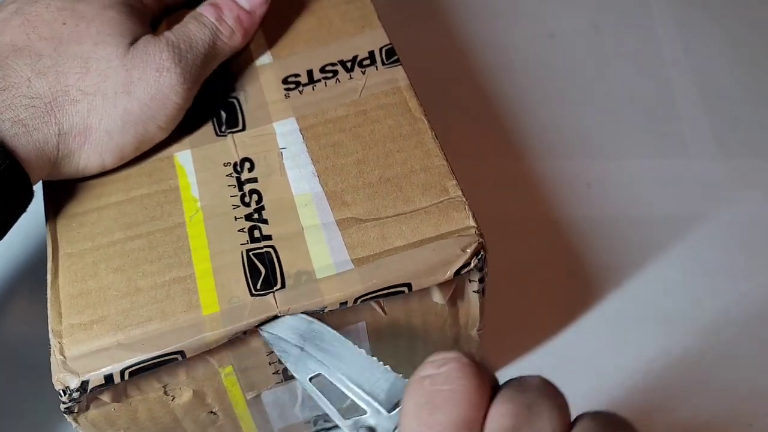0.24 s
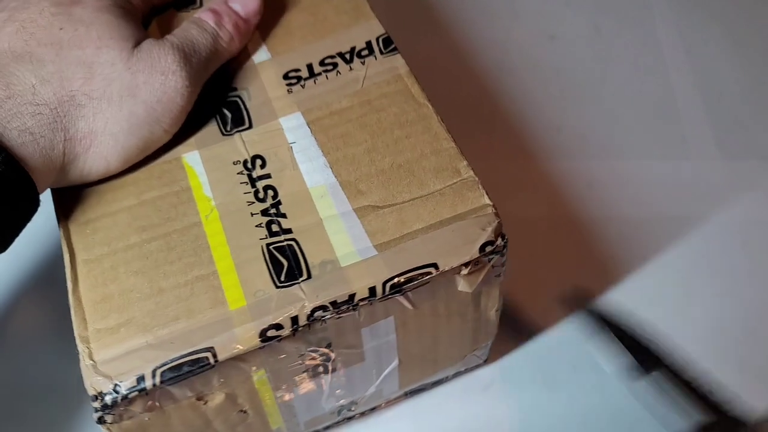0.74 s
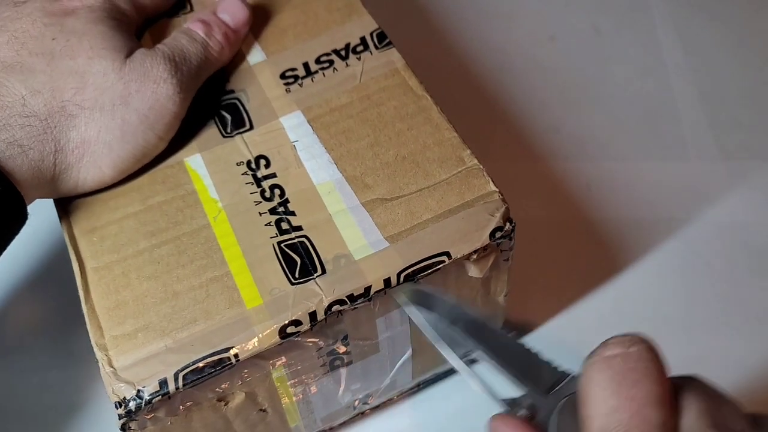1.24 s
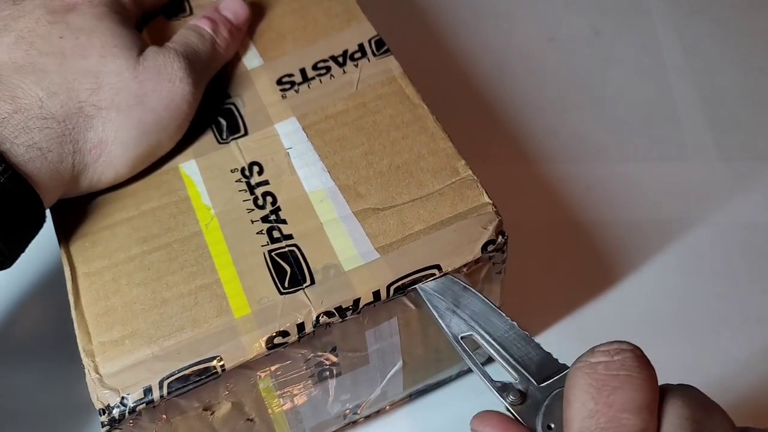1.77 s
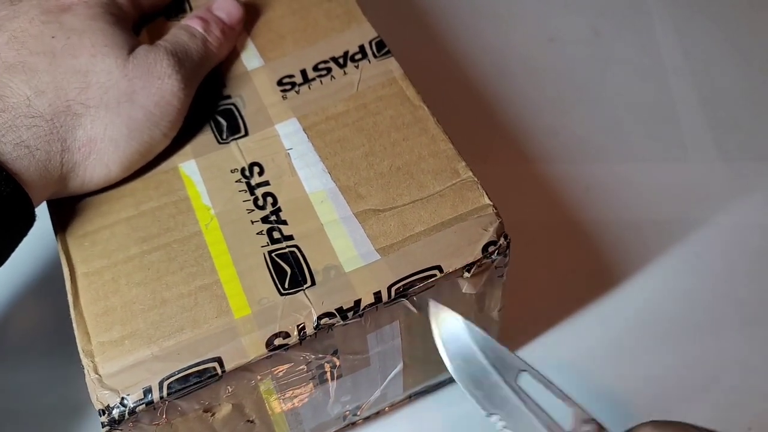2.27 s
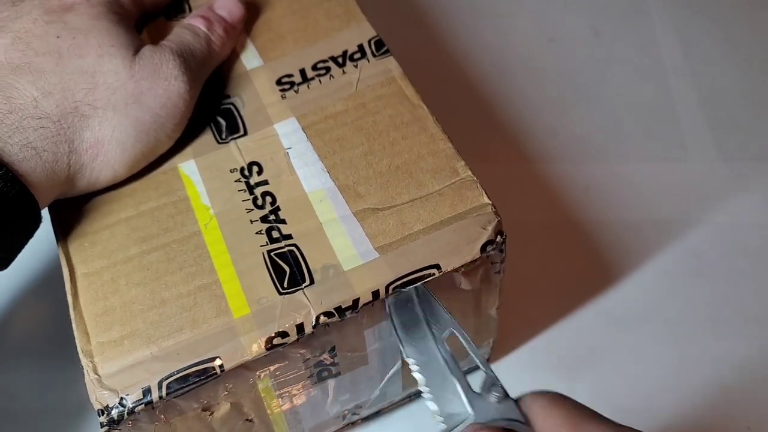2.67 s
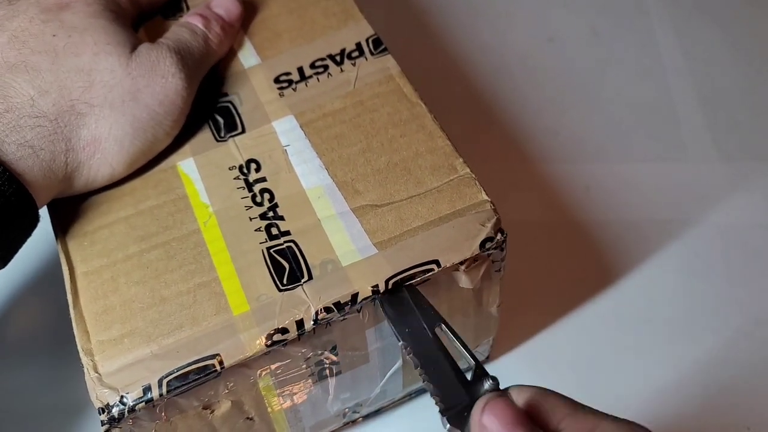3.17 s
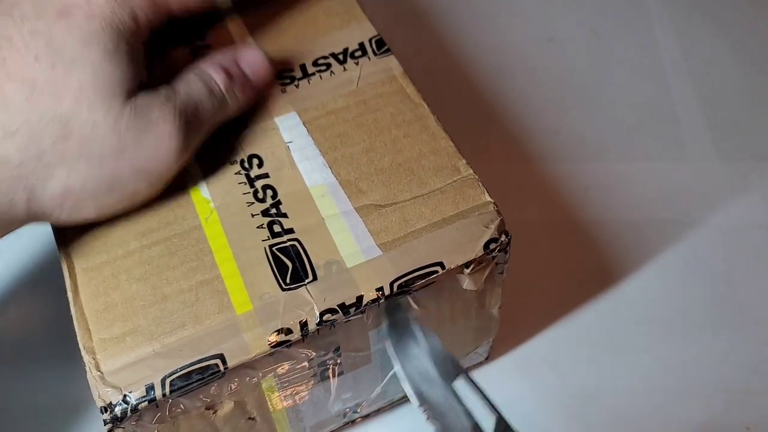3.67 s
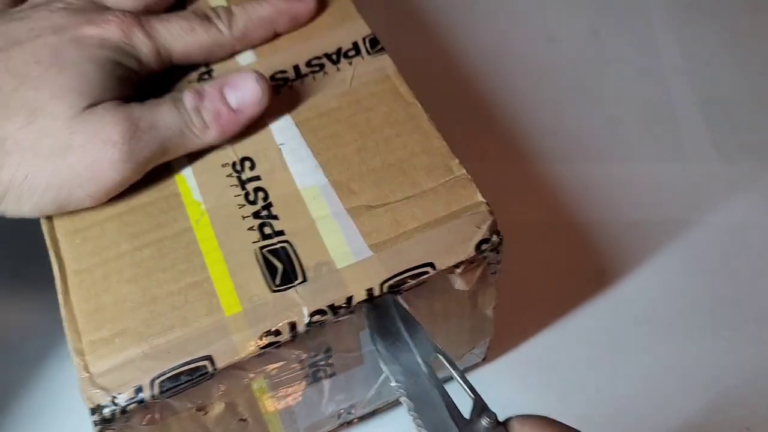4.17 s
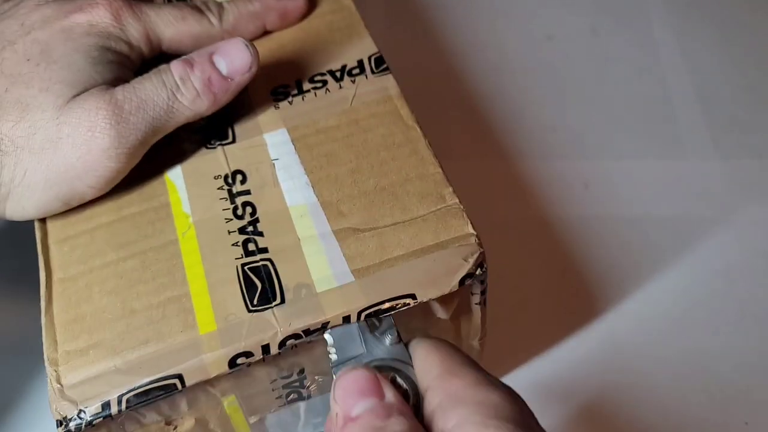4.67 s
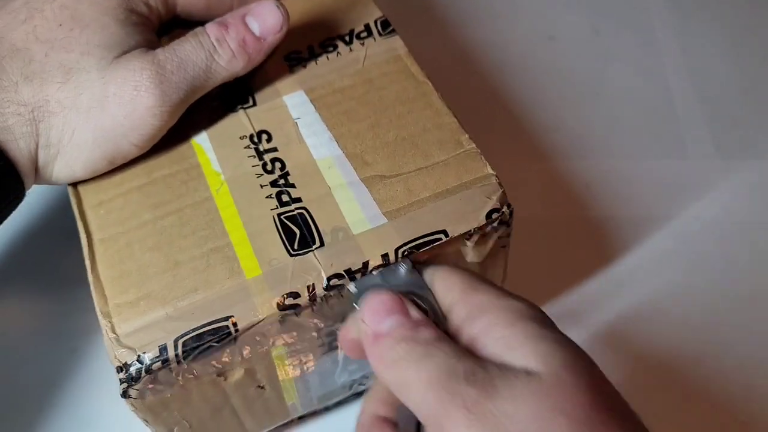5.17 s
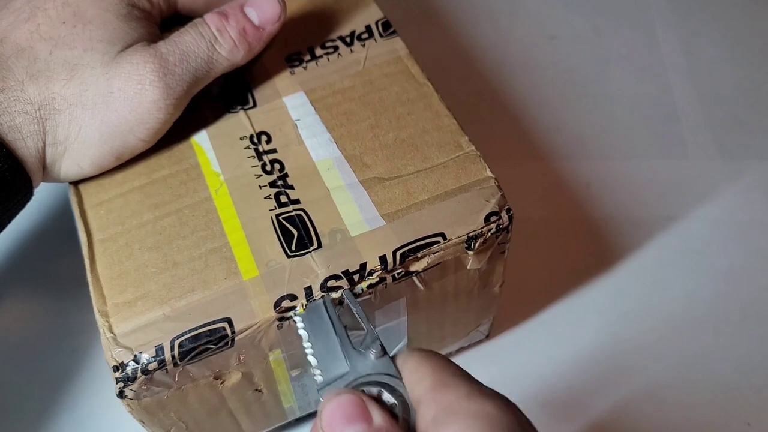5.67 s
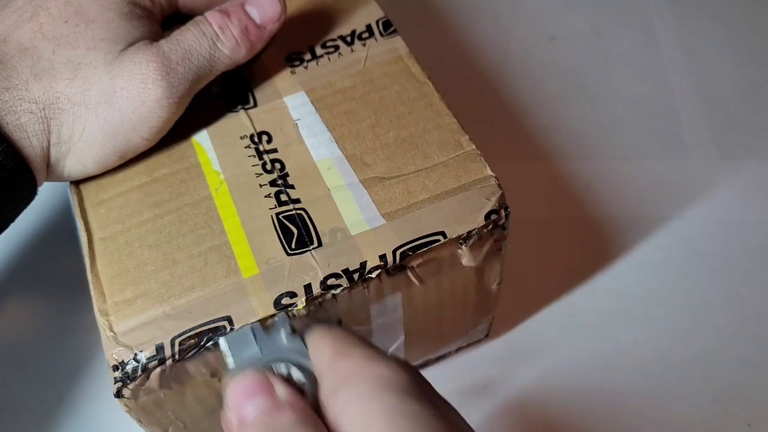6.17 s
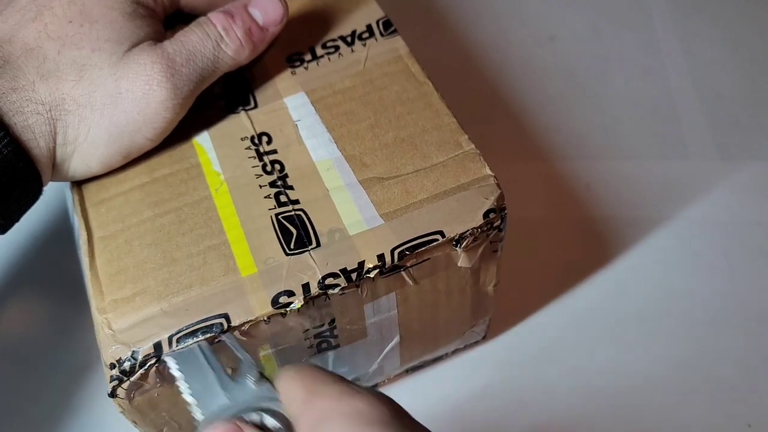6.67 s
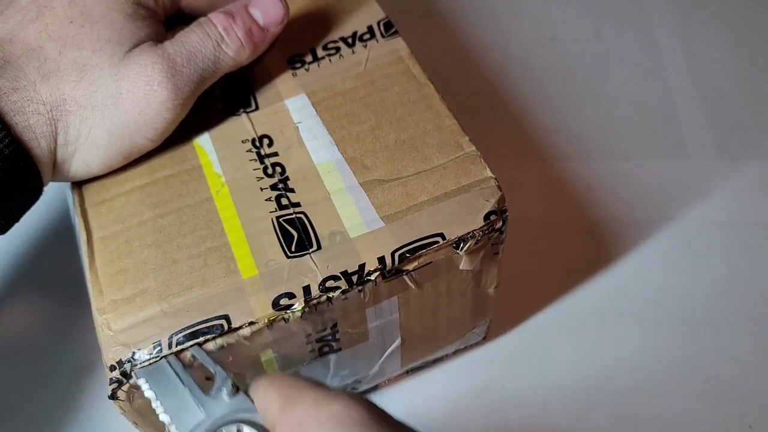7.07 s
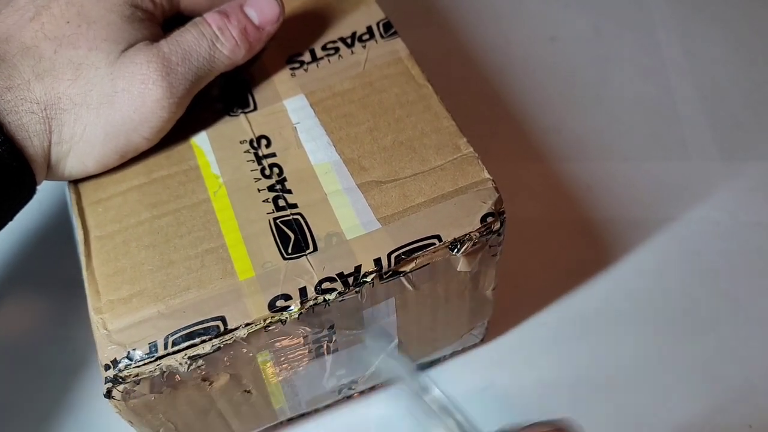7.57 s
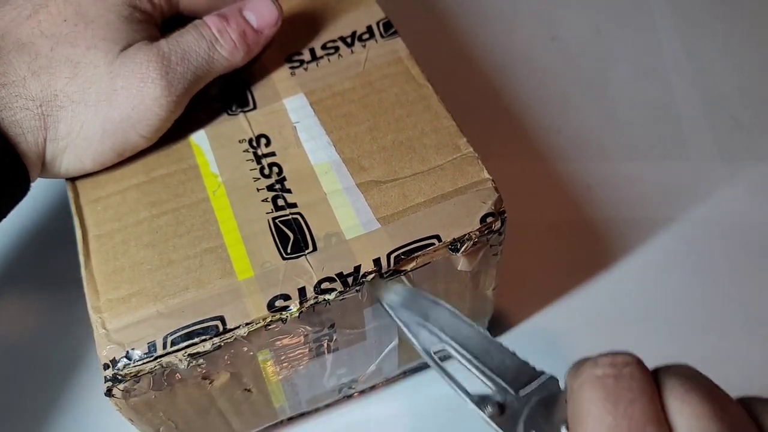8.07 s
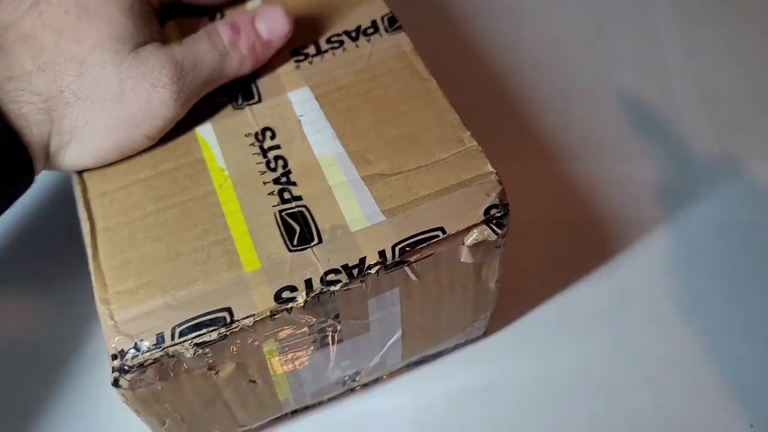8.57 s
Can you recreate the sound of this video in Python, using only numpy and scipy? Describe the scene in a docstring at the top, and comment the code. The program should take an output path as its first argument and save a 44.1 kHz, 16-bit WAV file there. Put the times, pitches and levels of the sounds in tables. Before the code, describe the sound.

In a quiet small room, a knife blade scrapes through tape and cardboard right by the microphone. The first cut ends in a loud crack. A few separate rasps and ticks lead into a run of quick, uneven sawing strokes, with the tape crackling and the box popping and softly thumping. The strokes thin out, and after a short lull comes one more cut with some light knocks.

```python
"""A serrated knife saws through the packing tape along the edge of a cardboard box, close to the microphone.
Stick-slip clicks, shaped by each stroke, excite the card, the box panels and the tape film as filters.
Now and then the tape snaps or the card pops, ticks or is tapped, as short fracture bursts,
or a panel is knocked, a decaying oscillation; the first cut ends in a loud crack.
Faint modes of the hollow box, the echo of a small room and still air surround it all."""
import sys
import numpy as np
from scipy import signal
from scipy.fft import rfft, irfft, next_fast_len
from scipy.io import wavfile

SR = 44100
rng = np.random.default_rng(int(sys.argv[2]) if len(sys.argv) > 2 else 0)


def to_wav(sig):
    """Store sig (one row per channel, or 1-D mono) as 16-bit WAV at the path in sys.argv[1].

    Samples outside -1..1 are clipped; the rate is SR.
    """
    pcm = np.clip(np.atleast_2d(sig), -1, 1) * 32767
    pcm = np.round(pcm).astype(np.int16)
    wavfile.write(sys.argv[1], SR, pcm.T)  # frames by channels


N = 389841
T = np.arange(N) / SR  # time, s

# radiation colour of the box panels: f/Hz, relative level/dB
PANEL_COLOUR = [(30, -44.5), (65, -12), (100, -2.5), (160, -1), (350, 0), (450, -3), (620, -17.5),
                (1500, -75.5)]
# radiation colour of a fracture in cardboard: f/Hz, relative level/dB
FRACTURE_COLOUR = [(170, -29.5), (380, 2), (620, -2.5), (1000, 0.5), (2300, -3.5), (3700, -4), (4600, -9),
                   (7000, -15.5), (14000, -57)]


def undb(db):
    """Level to amplitude: 20 dB is a factor of ten."""
    return 10 ** (np.asarray(db) / 20)


def unit(x):
    """Energy normalisation: scale to a mean energy of one per channel."""
    return x / np.sqrt(np.mean(np.sum(x ** 2, axis=-1)))


def on_log_axis(hz, points, column=1):
    """Logarithmic frequency scale: interpolate a table column linearly in log frequency."""
    rows = np.array(points, float)
    return np.interp(np.log(hz + 1), np.log(rows[:, 0]), rows[:, column])


def response(points, size=4096):
    """Minimum phase: fold the cepstrum of a colour to get its causal impulse response, of energy one."""
    magnitude = undb(on_log_axis(np.fft.rfftfreq(size, 1 / SR), points))
    cepstrum = irfft(np.log(magnitude))
    cepstrum[1:size // 2] *= 2
    cepstrum[size // 2 + 1:] = 0
    return unit(irfft(np.exp(rfft(cepstrum))))


def through(x, impulse):
    """Linear systems: convolve both channels with an impulse response."""
    return signal.fftconvolve(x, np.atleast_2d(impulse), axes=-1)[:, :x.shape[-1]]


def fade(t, t60):
    """Exponential damping: the amplitude falls by 60 dB in t60 seconds."""
    return np.exp(-np.log(1000) * t / t60)


def walk(rate):
    """Random modulation: normal values drawn rate times a second and joined by straight lines."""
    count = int(T[-1] * rate) + 2
    return np.interp(T * rate, np.arange(count), rng.standard_normal(N)[:count])


def diffuse(size, alike_hz):
    """Diffuse-field coherence: two noise spectra, alike in the bass and unrelated in the treble."""
    hz = np.fft.rfftfreq(size, 1 / SR)
    mid, side = rfft(rng.standard_normal((2, size)))
    alike = 1 / (1 + (hz / alike_hz) ** 2)
    common = mid * np.sqrt(1 + alike)
    opposed = np.array([[1], [-1]]) * side * np.sqrt(1 - alike)
    return hz, (common + opposed) / np.sqrt(2)


def lag_at(s, scatter_ms):
    """Arrival-time difference: samples by which the left channel hears a spot on the box late."""
    # where the blade works along the edge: t/s, lag of the left channel/ms
    place = [(0, 0.077), (5.2, 0.085), (6.1, -0.049), (7.4, -.07), (8.2, 0.096)]
    return np.rint((np.interp(s, *np.transpose(place)) + scatter_ms) * SR / 1000).astype(int)


def add(out, s, sound):
    """Superposition: mix a short sound in at time s."""
    start = int(s * SR)
    out[:, start:start + sound.shape[1]] += sound[:, :out.shape[1] - start]


def air():
    """Stationary noise: faint coloured rumble and hiss of still room air."""
    # f/Hz, relative level/dB
    air_colour = [(20, -18), (50, -3), (90, -4), (200, -15.5), (370, -16.5), (850, -29), (1550, -24),
                  (2300, -40), (15000, -52)]
    hz, noise = diffuse(2 * N, alike_hz=300)
    hush = irfft(noise * undb(on_log_axis(hz, air_colour)))[:, :N]
    return unit(hush) * np.sqrt(N) * undb(-64.5)


def room(x, table_db, table_t60, wall_gap_s, count=15):
    """Reverberation: quick reflections off table and hands, then the walls, each band dying at its own rate."""
    # echo of the walls: f/Hz, level against the direct sound/dB, T60/s
    walls = [(100, -9.5, 0.43), (250, -11.5, 0.43), (450, -9.5, 0.55), (740, -9, 0.54), (1620, -9, 0.63),
             (3170, -8.5, 0.65), (6500, -7.5, 0.41), (13000, -9, 0.35)]
    t = T[:SR]
    hz, noise = diffuse(SR, alike_hz=523)
    edges = np.geomspace(50, 18000, count + 1)
    scatter_noise = diffuse(SR, alike_hz=490)[1]
    scattered = irfft(scatter_noise * hz / (hz + 700))  # small things reflect little bass
    echo = undb(table_db) * unit(scattered * fade(t, table_t60) * (t > .0008))
    for lo, hi in zip(edges, edges[1:]):
        level_db, t60 = (on_log_axis(np.sqrt(lo * hi), walls, k) for k in (1, 2))
        band = irfft(noise * (hz >= lo) * (hz < hi))
        tail = band * fade(t, t60) * np.minimum(t / wall_gap_s, 1) ** 2
        echo += undb(level_db) * unit(tail) * np.sqrt(2 * (hi - lo) / SR)  # share of the spectrum
    return x + through(x, echo)


def hollow(x, ring_db):
    """Modal resonance: the hollow box rings on faintly after whatever shakes it."""
    # modes of the box: f/Hz, relative level/dB, T60/s
    modes = [(87.4, -3, 0.38), (161.6, -6.5, 0.58), (226.7, -5, 0.54), (1470, -7, 0.3)]
    t = T[:SR // 2]
    ring = sum(undb(db) * np.cos(2 * np.pi * hz * t) * fade(t, t60) for hz, db, t60 in modes)
    return x + undb(ring_db) * through(x, unit(ring))


def wall(t):
    """Damped free vibration: a short note of the side wall, its pitch drawn a little differently each time."""
    mean_hz, t60 = 372, 0.068
    hz = mean_hz * (1 + 0.069 * rng.standard_normal())
    return unit(np.sin(2 * np.pi * hz * t)[None] * fade(t, t60))


def knocks():
    """Impulsive excitation: a knocked or shoved panel, at the end the knife set down; panel and side wall ring."""
    # t/s, swing level over 10 ms/dB, f/Hz, T60 of the damping/periods
    blows = [(0.52, -24.5, 426, 7), (0.559, -33.5, 100, 7.2), (1.403, -38.5, 125, 8.6),
             (3.308, -43.5, 66, 1.8), (4.264, -42.5, 91.4, 9.5), (4.592, -33.5, 115, 2.7),
             (5.489, -29.5, 120, 5.7), (5.694, -36, 137, 4.1), (5.983, -35, 146, 5.5),
             (6.023, -34, 143, 2.2), (6.038, -35, 153, 2.4), (6.273, -31.5, 143, 3.9),
             (6.294, -28, 197, 4.9), (6.647, -36, 177, 3.2), (8.448, -32.5, 163, 6.1),
             (8.508, -34.5, 121, 2.9)]
    out, t = np.zeros((2, N)), T[:SR // 2]
    window = np.sqrt(SR / 100)  # refers levels to 10 ms
    for s, db, hz, cycles in blows:
        swing = np.sin(2 * np.pi * hz * t) * t * fade(t, cycles / hz)
        add(out, s, window * undb(db) * (unit(swing[None]) + undb(-5) * wall(t)))
    return out


def slips(rate, spread_db, scatter_ms, rub):
    """Stick-slip friction: clicks of unequal size from spots around the blade, over smooth rubbing; rms one."""
    chance = rng.random(N)
    size = np.minimum(rng.exponential(size=N), 4)
    sign = rng.choice([-1, 1], N)
    clicks = unit((chance < rate / SR) * undb(spread_db * size) * sign)
    force = clicks + rub * unit(rng.standard_normal(N))
    lag = lag_at(T, scatter_ms * rng.standard_normal(N))
    arrival = np.clip(np.arange(N) + lag, 0, N - 1)
    return unit(np.array([np.bincount(arrival, force, N), force])) * np.sqrt(N)


def scratching():
    """Friction chatter: the bare tip skates over taut tape, each touch swelling and lifting off."""
    # touches: t/s, duration/s, drive level at the peak/dB
    touches = [(-.03, 0.2, -50.5), (0.226, 0.08, -44), (1.068, 0.13, -67), (1.846, 0.12, -65.5),
               (1.97, 0.081, -47), (8.47, 0.28, -51)]
    # colour of the scratching tip: f/Hz, relative level/dB
    tip_colour = [(600, -30.5), (1100, -7.5), (1450, -2.5), (1750, -9), (2200, -6), (2550, -22),
                  (3900, -13.5), (5000, -39.5)]
    touch = sum(undb(db) * np.sin(np.pi * np.clip((T - s) / length, 0, 1)) for s, length, db in touches)
    chatter = slips(rate=680, spread_db=2.5, scatter_ms=0.094, rub=.3)
    return undb(-2.5) * through(chatter * touch, response(tip_colour))


def fracture(t, t60, splinter):
    """Brittle fracture: one sharp release and a quick run of splintering fibres, with an evened spectrum."""
    hz, noise = diffuse(len(t), alike_hz=2580)
    burst = splinter * unit(irfft(noise * hz / (hz + 1200)) * fade(t, t60))
    burst[:, 0] += 1
    spectrum = rfft(burst)
    evened = spectrum / abs(spectrum) ** (3 / 4)
    return irfft(evened) * (t < t[-1] / 2)


def pops(t60, splinter, sharpness, size=4096):
    """Local resonance: pops, ticks and taps on the card ring woodily, each at the pitch of its spot."""
    # t/s, level over 10 ms/dB, f of the spot/Hz
    spots = [(0.279, -47, 1420), (0.533, -25, 1150), (0.549, -22, 1593), (0.558, -27, 2014),
             (1.06, -67.5, 1500), (1.092, -62.5, 900), (1.352, -34, 350), (1.5631, -42, 1720),
             (1.658, -39, 430), (2.021, -48.5, 910), (2.471, -58, 1700), (2.721, -40.5, 426),
             (2.869, -29, 840), (3.553, -49.5, 1490), (3.5835, -43, 790), (3.683, -51.5, 800),
             (4.239, -45.5, 1577), (4.333, -45, 350), (4.363, -44.5, 1150), (4.698, -28, 348),
             (4.707, -36, 1005), (4.7304, -30.5, 820), (5.051, -19, 784), (5.4714, -29, 800),
             (8.447, -33.5, 524), (8.451, -33, 1170), (8.5087, -28, 1600), (8.511, -34.5, 428),
             (8.674, -38.5, 620)]
    out, t = np.zeros((2, N)), np.arange(size) / SR
    window = np.sqrt(SR / 100)  # refers levels to 10 ms
    card = response(FRACTURE_COLOUR)
    for s, db, hz in spots:
        resonance = signal.iirpeak(hz, sharpness, fs=SR)
        burst = through(fracture(t, t60, splinter), card)
        sound = unit(signal.lfilter(*resonance, burst))
        sound[0] = np.roll(sound[0], lag_at(s, 0))
        add(out, s, window * undb(db) * sound)
    return out


def snaps(size=4096):
    """Sudden release of tension: taut tape cracks, kicking card and film; panels and side wall ring after it."""
    # tape and fibres giving way: t/s, reference level over 10 ms/dB, relative panel flex/dB, relative fizz/dB
    breaks = [(0.1746, -59, -14, 11), (0.385, -56.5, -19.5, 16.5), (0.41, -48.5, -25, -1),
              (0.465, -48, -10, -0.5), (0.496, -43, 6, -2), (0.5174, -15.5, -6.5, -19.5),
              (0.5579, -30.5, -7.5, -9), (1.268, -73, -20, -11), (1.3498, -29.5, -2.5, -10.5),
              (2.036, -48.5, -4.5, -10), (2.709, -38.5, -5.5, -11), (2.868, -25.5, -7, -7),
              (3.3078, -33, -18, 10), (4.194, -59.5, -8, -9), (4.423, -44, -3, -14),
              (4.429, -35.5, -10, -12.5), (4.519, -41.5, -18.5, -7), (4.6943, -23.5, -8, -32),
              (4.7301, -28.5, -14, -17), (4.951, -40, -28.5, 0.5), (5.0507, -19, -9, -18.5),
              (5.0799, -32.5, -12, -4), (5.095, -37.5, -21, -2.5), (5.4361, -38, -14, -0.5),
              (5.451, -41, -15, -15), (5.4711, -45, -5, -8.5), (5.48, -34.5, 6, -14.5),
              (5.4974, -31, -7.5, -14), (5.612, -49, -18, -7), (5.641, -39, -2, -16),
              (5.789, -42.5, -16, -3), (5.842, -23, -15.5, -15.5), (5.8703, -25, -6, -16),
              (5.881, -43, -8, -18), (6.1433, -36, 1, -14), (6.157, -32.5, -12, -8), (6.1715, -37, -16, -8),
              (6.5543, -50, -16, 13.5), (6.617, -45, 7, -1), (6.73, -55, -12, 5), (7.204, -56, -22, -20),
              (7.5892, -53.5, 10.5, -7.5), (7.878, -59, 5, -12), (8.4129, -40, 4, -9),
              (8.444, -40.5, 7.5, -3), (8.45, -35.5, 7, -2)]
    # colour of a tick in the plastic film: f/Hz, relative level/dB
    film_colour = [(1500, -23), (4100, -9), (5600, -1), (7100, -1), (9000, -5), (15000, -6)]
    out, t = np.zeros((2, N)), np.arange(size) / SR
    window = np.sqrt(SR / 100)  # refers levels to 10 ms
    card, panel, film = response(FRACTURE_COLOUR), response(PANEL_COLOUR), response(film_colour)
    for s, db, flex_db, fizz_db in breaks:
        burst = fracture(t, t60=.007, splinter=2.8)
        body = undb(-2.5) * unit(through(burst, panel)) + undb(-2.0) * wall(t)
        sound = undb(-0.5) * unit(through(burst, card)) + undb(flex_db) * body
        tick = fracture(t, t60=0.012, splinter=4.9)
        sound += undb(fizz_db) * unit(through(tick, film))
        sound[0] = np.roll(sound[0], lag_at(s, 0))
        add(out, s, window * undb(db) * sound)
    return out


def shifting(x, depth_db, rate, count=20):
    """Selective mode excitation: the moving blade favours now one band of the card's resonances, now another."""
    size = next_fast_len(N, real=True)
    spectrum, hz = rfft(x, size), np.fft.rfftfreq(size, 1 / SR)
    place = np.interp(np.log(hz + 1), np.log([500, 7000]), [0, count - 1])
    total = 0
    for k in range(count):
        overlap = np.maximum(1 - abs(place - k), 0)  # triangular bands that add up to one
        total = total + irfft(spectrum * overlap, size)[:, :N] * undb(depth_db * walk(rate))
    return total


def effort():
    """Drive envelopes, summed as power: strokes graze, bite, swell or sag and let go; gives levels in dB."""
    # pushes and pulls of the blade: t/s, duration/s, card drive level/dB,
    # relative panel flex/dB, relative tape fizz/dB, swell from start to end/dB
    strokes = [(0, 0.33, -64, -8, -1.5, -8.5), (0.435, 0.1, -49, 0, -11, 19),
               (0.503, 0.047, -25.5, -2.5, -12, 4), (1.347, 0.055, -42, 10, -14, 1),
               (1.577, 0.02, -39, 6.5, -10, -8), (1.615, 0.05, -41, 2.5, -11, -16),
               (1.938, 0.087, -54.5, -6.5, -13.5, 13), (2.459, 0.056, -58, 7.5, -19.5, 5),
               (2.703, 0.062, -41, -3.5, -13, -9.5), (2.844, 0.092, -47, -7, -9, 0.5),
               (3.065, 0.016, -41.5, -6, -9.5, 11), (3.198, 0.061, -47.5, -4, -10, -8),
               (3.519, 0.21, -57.5, 3.5, -10, -10.5), (4.063, 0.084, -70, -1, -5, 0),
               (4.209, 0.24, -50.5, 0, -9.5, 4), (4.487, 0.055, -43, -3, -9, -4.5),
               (4.607, 0.098, -44, 0, -7.5, 6), (4.76, 0.077, -44, 4.5, -8, 3.5),
               (4.935, 0.084, -52.5, -11, -9, -4.5), (5.01, 0.11, -42.5, 6.5, -10, -2.5),
               (5.232, 0.067, -46.5, -6, -5.5, -2.5), (5.32, 0.043, -45, 7.5, -11.5, -7.5),
               (5.412, 0.057, -47.5, -16, -7.5, 18), (5.468, 0.074, -34, 2.5, -12.5, -4),
               (5.596, 0.081, -43, -17, -6.5, -2), (5.644, 0.065, -39.5, 7, -12, 1.5),
               (5.748, 0.086, -50, 5, -5, 26), (5.849, 0.062, -40, 1.5, -12, -21),
               (5.938, 0.095, -46, -3.5, -4.5, -5), (6.078, 0.15, -53, -16, -2.5, -14),
               (6.123, 0.066, -39, 1, -9, 4.5), (6.228, 0.077, -40.5, -1, -6, 13.5),
               (6.348, 0.13, -47, -4.5, -8, 15.5), (6.559, 0.11, -45, -11, -5, -1.5),
               (6.734, 0.09, -47, -1.5, -9, 11), (6.895, 0.076, -39.5, -4, -9, -7.5),
               (7.027, 0.097, -52.5, -4.5, -7.5, 2.5), (7.195, 0.033, -45, -6, -9.5, -14),
               (7.444, 0.13, -56, 0, -5.5, 3), (8.274, 0.0091, -52, 5, -29, 12),
               (8.302, 0.12, -51.5, -10, -7.5, 26), (8.434, 0.096, -38.5, -1.5, -10.5, -18),
               (8.68, 0.13, -62, 9, -8, -19)]
    # light rubbing of the blade, which never quite leaves the slit: t/s, drive level/dB
    contact = [(0, -63), (.45, -64.5), (.9, -82.5), (2.4, -83), (2.9, -59.5), (3.4, -68.5), (4.15, -82.5),
               (4.4, -61), (6.8, -59.5), (7.4, -69), (8.2, -77), (8.8, -60.5)]
    graze_db, graze_s = -18, 0.024  # light touch before the bite: level against the stroke, build-up time
    bite_s, release_t60_s, settle_t60_s = 0.015, 0.062, 0.13  # teeth bite, rasp dies away, panels settle
    # rows: rasp, flex, fizz
    rubbing_db = np.interp(T, *np.transpose(contact)) + np.array([[0], [-2], [-7]])
    power = undb(rubbing_db) ** 2
    for s, length, db, flex_db, fizz_db, swell_db in strokes:
        near = (T > s - graze_s) & (T < s + .5)
        t = T[near] - s
        grip = np.interp(t, [-graze_s, 0, bite_s], [0, undb(graze_db), 1])
        push = grip * undb(db + swell_db * (np.clip(t / length, 0, 1) - .5))
        after = np.maximum(t - length, 0)
        rasp = push * fade(after, release_t60_s)
        flex = push * fade(after, settle_t60_s) * undb(flex_db)
        power[:, near] += np.array([rasp, flex, rasp * undb(fizz_db)]) ** 2
    rasp_db, flex_db, fizz_db = 10 * np.log10(power)
    return rasp_db, flex_db - rasp_db, fizz_db - rasp_db


def sawing():
    """Stick-slip excitation of coupled radiators: teeth rasp the card, flex the panels and fizz in the tape."""
    # resistance of the uncut card: t/s, toughness from 0 to 1
    resistance = [(5.9, 0.86), (6.5, 0.51)]
    # radiation colours of card and tape: f/Hz, relative level/dB
    card_colour = [(220, -28), (350, -7), (440, -4), (620, -1.5), (800, -1.5), (1200, -0.5), (2150, -3.5),
                   (2550, -8.5), (3600, -9), (5200, -26), (12000, -57)]
    tape_colour = [(1500, -49.5), (3800, -4), (5000, 3), (7000, 2.5), (9800, -4), (12500, 0), (16000, -12)]
    flap_hz, flap_q = 420, 3.1
    rasp_db, flex_db, fizz_db = effort()
    pressure = undb(rasp_db + 1.4 * walk(rate=76))
    tearing = unit(undb(4.5 * walk(rate=330))) * np.sqrt(N)  # fibres part in little clumps
    toughness = np.clip(np.interp(T, *np.transpose(resistance)), 0, 1)
    # single teeth rip through a fibre; as toughness falls, the blade glides more than it catches
    catches = 0.62 * toughness * slips(rate=170, spread_db=2.0, scatter_ms=0, rub=0)
    grit = np.sqrt(0.61 * toughness) * slips(rate=1000, spread_db=2.0, scatter_ms=0.049, rub=0.27)
    glide = np.sqrt(1 - 0.59 * toughness) * slips(rate=13000, spread_db=-2.0, scatter_ms=0.059, rub=1)
    scrape = (grit + glide) * pressure * tearing
    crackle = 0.8 * shifting(catches * pressure, depth_db=8.0, rate=210)  # each fibre has its own ring
    tugging = slips(rate=660, spread_db=3.0, scatter_ms=0.45, rub=0.46) * pressure
    rasp = shifting(scrape, depth_db=4, rate=70) + crackle
    card = undb(-3.5) * through(rasp, response(card_colour))
    fizz = (scrape + catches * pressure) * undb(fizz_db)
    tape = undb(2.27) * through(fizz, response(tape_colour))
    panel = undb(-3.0) * through(tugging * undb(flex_db), response(PANEL_COLOUR))
    # the freed flap drones as the blade rubs along it
    flap = signal.lfilter(*signal.iirpeak(flap_hz, flap_q, fs=SR), response(PANEL_COLOUR))
    drone = undb(-0.5) * through(tugging * (1 - toughness), unit(flap))
    # flexing panels fan air against each microphone port separately
    low_band = signal.butter(2, [50, 110], "band", fs=SR, output="sos")
    draught = signal.sosfilt(low_band, rng.standard_normal((2, N)))
    fanning = unit(draught) * np.sqrt(N) * undb(rasp_db + flex_db - 18.5)
    return card + tape + panel + drone + fanning


def scene():
    """Superposition: the sources shake the box, the room answers and its air adds noise."""
    popping = pops(t60=0.022, splinter=3.5, sharpness=6.6)
    box = hollow(sawing() + scratching() + snaps() + popping + knocks(), ring_db=-28.0)
    return room(box, table_db=-6.0, table_t60=0.031, wall_gap_s=0.013) + air()


def record(dry):
    """Overload and band limit: the microphone clips at full scale, then a steep low-pass cuts the top."""
    low_pass = signal.ellip(8, .2, 70, 14700, fs=SR, output="sos")  # order, ripple dB, stop dB, edge Hz
    return signal.sosfilt(low_pass, np.clip(dry, -1, 1))


dry = scene()
out = record(dry)
to_wav(out)
```